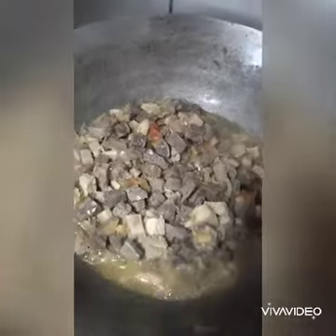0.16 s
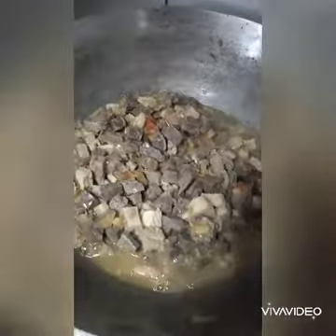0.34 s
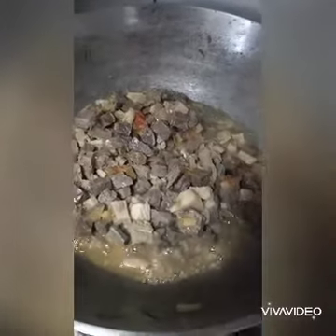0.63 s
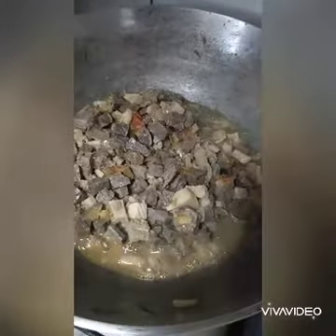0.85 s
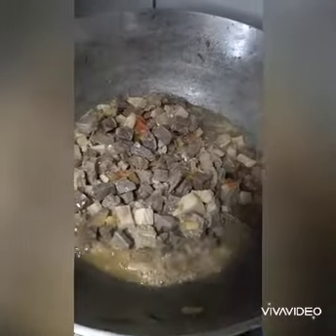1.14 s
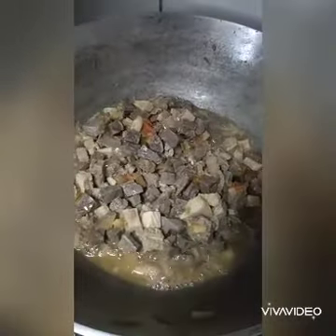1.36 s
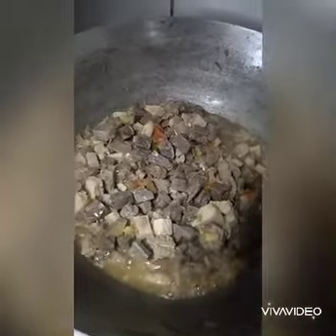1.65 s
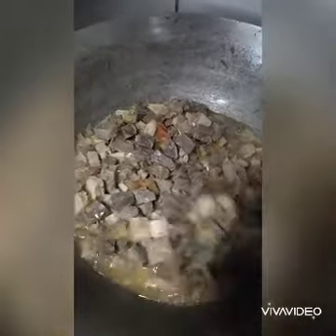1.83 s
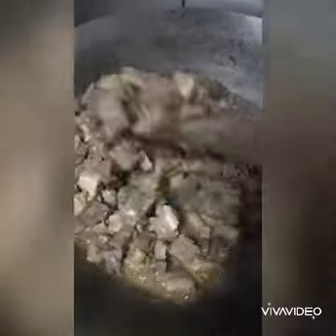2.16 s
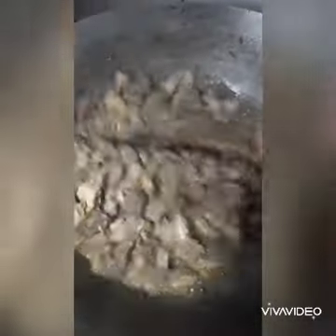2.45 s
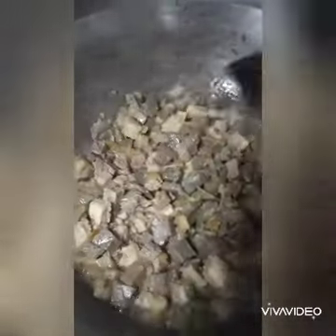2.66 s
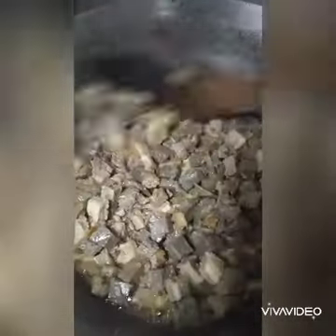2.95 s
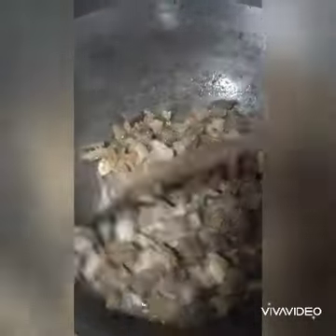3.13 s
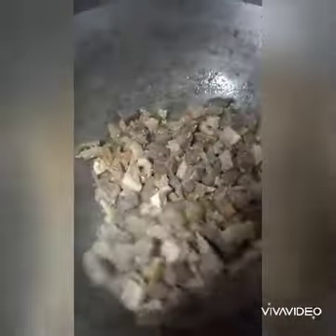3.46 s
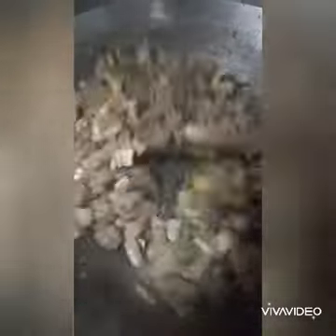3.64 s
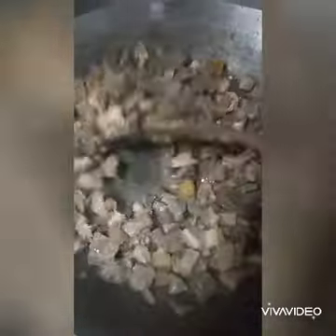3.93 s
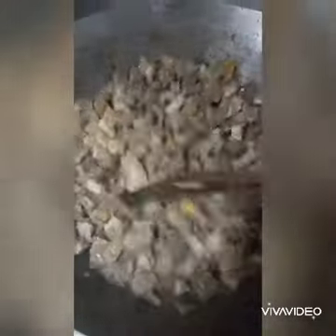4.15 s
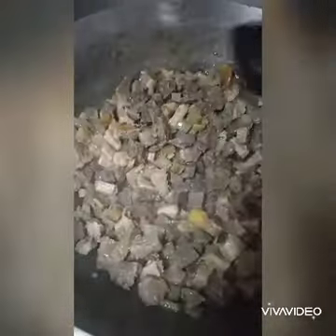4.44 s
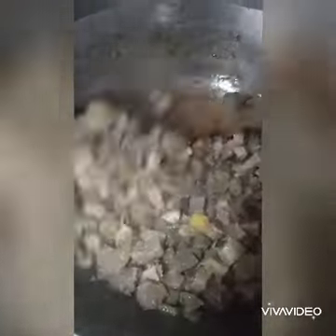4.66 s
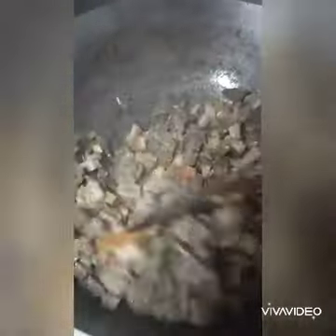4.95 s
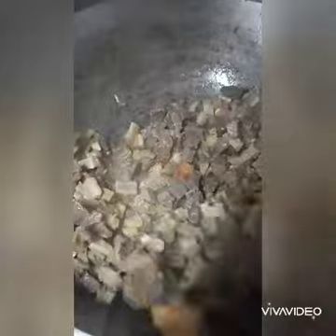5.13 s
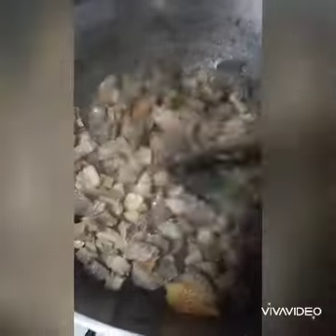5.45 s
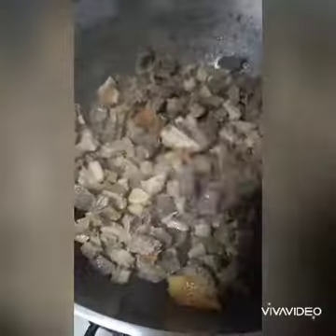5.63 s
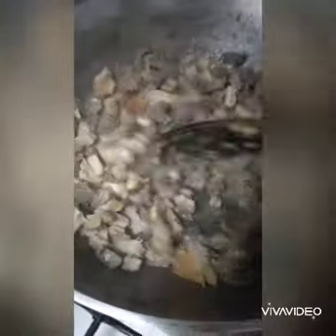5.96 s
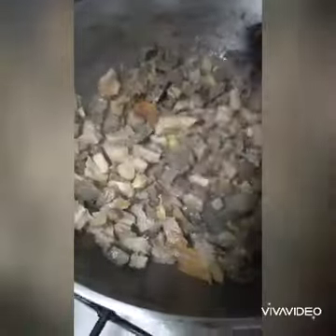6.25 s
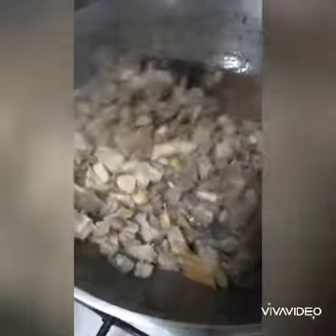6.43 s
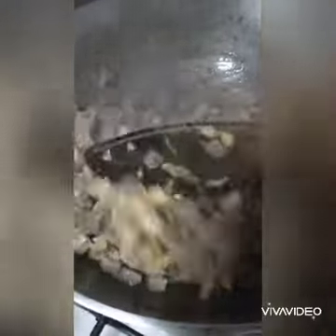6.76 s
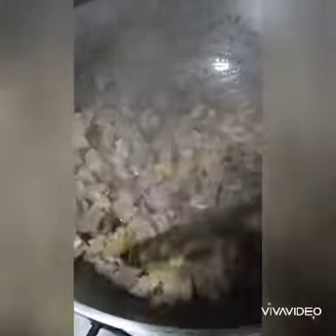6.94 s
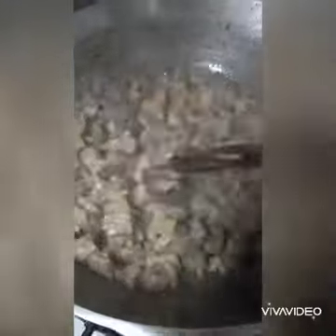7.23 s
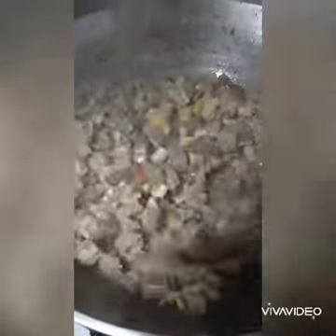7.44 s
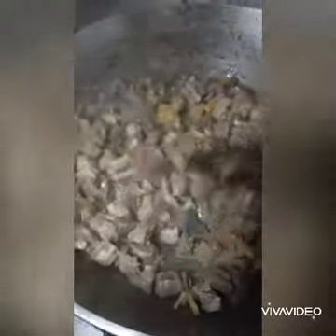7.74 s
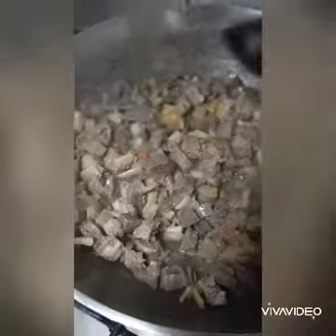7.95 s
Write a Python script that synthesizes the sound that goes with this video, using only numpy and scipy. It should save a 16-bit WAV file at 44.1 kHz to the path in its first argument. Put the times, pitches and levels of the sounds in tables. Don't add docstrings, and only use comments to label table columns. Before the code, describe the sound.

Two quick metallic clanks, then wet sizzling food stirred and tossed in a wok, with scrapes, low rumbles and scattered knocks, ending on a hard rap.

```python
import sys
import numpy as np
from scipy import signal
from scipy.fft import rfft, irfft
from scipy.io import wavfile
from scipy.ndimage import uniform_filter1d

SR = 44100
rng = np.random.default_rng(int(sys.argv[2]) if len(sys.argv) > 2 else 0)


def master(y):
    cut = np.clip(np.atleast_2d(y).T, -1, 1)
    pcm = np.round(cut * 32767)
    wavfile.write(sys.argv[1], SR, pcm.astype(np.int16))


def ratio_of_db(decibels):
    return 10 ** (np.asarray(decibels, float) / 20)


N = 356769

# (time [s], fizz level [dB], left minus right [dB], juice sloshing in the bowl [dB])
BOIL = [(0.0, -50.5, 0, -57.5), (0.7, -51, 0, -55.5), (1.44, -50, 1, -56.5), (1.85, -49, -1, -55.5),
        (2.5, -48.5, -1.5, -53.5), (3.2, -49.5, -1, -64), (3.7, -48.5, -1.5, -60), (4.1, -49, -2, -59.5),
        (4.25, -50, 0.5, -80), (4.66, -51.5, 0.5, -63), (5.1, -50.5, 0.5, -68), (5.5, -50.5, -1, -75),
        (6.1, -50.5, 1, -68), (6.5, -51.5, 2, -64), (7.07, -51.5, 2, -84), (7.6, -51.5, 3.5, -74),
        (8.09, -50, 0, -65)]
# (time [s], peak level [dB], rise by 20 dB [s], fall by 20 dB [s])
FOOD_TOSSES = [(0.17, -55, .5, .8), (0.57, -57, .05, 0.34), (1.98, -44, 0.16, 0.2), (2.16, -51.5, .4, .2),
               (2.335, -45.5, 0.29, 0.27), (2.56, -55.5, .06, 0.27), (2.69, -53, .06, 1),
               (3.07, -46, 0.1, 0.093), (3.22, -52.5, 0.33, 0.43), (3.44, -51, 0.1, 0.93),
               (3.58, -51, .4, 0.68), (3.735, -48.5, 0.62, 0.11), (4.06, -48.5, 0.056, 0.24),
               (4.37, -50.5, 0.025, .14), (4.48, -49, 0.13, 0.33), (5.17, -55, .07, .07),
               (5.3, -48.5, 0.22, 0.25), (5.42, -55.5, .2, 0.87), (5.74, -46.5, 0.067, 0.17),
               (6.1, -58, 0.23, 0.072), (6.34, -52.5, 0.17, 0.044), (6.6, -56, 0.65, .05),
               (6.86, -56, 0.16, 0.36), (7.03, -48.5, 0.084, 0.22), (7.25, -54.5, 0.19, 0.31),
               (7.49, -53.5, 0.077, .07), (7.73, -59.5, 0.35, 0.35), (7.86, -65, 0.088, 1)]
# (time [s], peak level [dB], rise by 20 dB [s], fall by 20 dB [s])
BLADE_DRAGS = [(0.2, -50.5, 0.28, 0.66), (0.37, -51, 0.41, 0.62), (0.76, -50.5, 0.057, 1),
               (1.01, -51, 0.46, 0.24), (1.26, -61, 0.077, 0.033), (1.59, -56, 0.17, .3),
               (1.84, -46, 0.044, 0.32), (1.98, -52, .2, 0.068), (2.19, -58.5, .3, .06),
               (2.43, -48.5, 0.083, 0.14), (2.76, -50.5, 0.18, 0.26), (3.03, -49, 0.03, 0.16),
               (3.1, -50, 0.099, 0.14), (3.45, -51.5, 0.059, 0.53), (3.83, -52.5, .08, 0.27),
               (3.9, -54, 0.21, .18), (4.44, -54.5, 0.072, 0.67), (4.8, -66, .1, 0.2),
               (4.93, -61.5, .1, 0.12), (5.17, -62, 0.075, 0.32), (5.36, -50, 0.17, 0.21),
               (5.77, -61.5, 0.091, 0.48), (6.26, -49, 0.13, 0.24), (6.4, -60, .1, 0.1),
               (7.22, -63.5, 0.14, 0.18), (6.76, -57.5, 0.027, 0.056), (4.17, -64, 0.061, 0.045),
               (7.405, -52, 0.011, 0.082), (7.478, -60.5, 0.076, 0.11), (7.9, -54.5, 0.079, 0.29)]
# (time [s], peak level [dB], brightness [dB per octave], blow length [s], left minus right [dB])
LIP_BLOWS = [
    (7.839, -30.5, 1.5, 0.00068, 2),
    (7.846, -25, 0.72, 0.0006, 6),
]
# (frequency [Hz], left minus right [dB])
PORT_LEAN = [(60, 2.5), (92, 4), (140, 2), (210, 9), (330, 15.5), (500, 5.5), (770, -13.5), (1170, 5.5),
             (1790, 7.5), (2740, 10), (4190, -5), (6410, 4), (9810, -14), (15000, 8)]
# (frequency [Hz], likeness [0-1])
PORT_SAMENESS = [(60, 0.9), (160, 1), (300, 0.24), (500, 0.57), (800, 0.2), (1500, 0.36), (3000, 0.12)]

LEFT_RIGHT = np.array([[0.5], [-0.5]])


def fizz():
    # (frequency [Hz], level [dB per Hz])
    left_colour = [(400, -38), (900, -72), (1300, -10), (2100, -14), (3300, -11.5), (4400, -10.5),
                   (5000, -12), (6000, -8), (8600, -5.5), (9700, -13.5), (12200, -15.5), (12700, -22),
                   (14600, -24), (15300, -11)]
    # (frequency [Hz], level [dB per Hz])
    right_colour = [(400, -45), (650, -11.5), (900, -16.5), (2000, -12), (3900, -14.5), (5000, -18.5),
                    (6200, -10), (7000, -11.5), (8000, -6), (9700, -17.5), (12000, -28), (13500, -17.5),
                    (14500, -33), (15400, -56)]
    # (frequency [Hz], width [Hz], left boost [dB], right boost [dB])
    fizz_resonances = [(633, 32, -34, 6), (1394, 39, 10, 8.5), (1663, 67, 11.5, -3), (1873, 95, 11, -7),
                       (2174, 110, 7, 1), (4486, 57, 0.5, 0), (6503, 243, 9, -18)]
    hz = np.fft.rfftfreq(N, 1 / SR)
    boost = 1
    for centre_hz, width_hz, left_db, right_db in fizz_resonances:
        boost = boost + ratio_of_db(np.array([[left_db], [right_db]])) * bell(hz, centre_hz, width_hz)
    gain = boost * ratio_of_db(np.array([read(left_colour, hz), read(right_colour, hz)]))

    bursts = evened(pops(30000, spread_db=0.8)) * ratio_of_db(0.5 * drift(460) + 0.12 * drift(4000))
    coloured = irfft(rfft(bursts, axis=1) * gain, N, axis=1)
    sound = mid_evened(patchy(coloured, depth_db=1.36))

    toss_power = ratio_of_db(-6.5) ** 2 * swells(FOOD_TOSSES)
    level = np.sqrt(ratio_of_db(column(BOIL, order=1)) ** 2 + toss_power)
    return sound * level * ratio_of_db(2.5 + column(BOIL, order=2) * LEFT_RIGHT)


def tumbling():
    # (frequency [Hz], level [dB per Hz])
    slap_colour = [(500, -17), (900, -12), (1500, 0.5), (2300, -1), (3100, -4.5), (3700, -21), (8000, -28)]
    still_db, juice_to_food_db, juice_share = -58, -2.5, 1
    slaps = pops(9000, spread_db=2.5) * ratio_of_db(1.5 * drift(760))
    sound = mid_evened(to_ports(slaps, lambda hz: ratio_of_db(read(slap_colour, hz))))
    wet_db = still_db + juice_to_food_db + juice_share * (column(BOIL, order=3) - still_db)
    level = np.sqrt(swells(FOOD_TOSSES) + ratio_of_db(wet_db) ** 2)
    return sound * level * ratio_of_db(-5 * LEFT_RIGHT)


def knocks():
    # (time [s], peak level [dB], brightness [dB per octave], blow length [s], left minus right [dB])
    floor_blows = [
        (0.016, -24.5, 6.5, 0.0019, 6),
        (0.023, -29.5, 5.5, 0.00069, 12),
        (2.685, -21.5, 1.5, 0.00044, 2),
        (3.057, -43, -7, 0.0087, -8),
        (3.819, -43, -10, 0.012, -5),
        (7.405, -44, -8, 0.0024, -7),
    ]
    slope_blows = [
        (4.362, -26.5, 0, 0.0011, 2.7),
    ]
    buried_blows = [
        (3.486, -23.5, -6, 0.0022, 1),
    ]
    rim_blows = [
        (6.141, -28, 0.87, 0.00061, 3),
        (6.146, -36, 0, 0.0011, 11),
    ]
    lid_blows = [
        (.001, -19.5, 2.4, 0.00078, 4),
        (.049, -16.5, 3.1, 0.00034, 5.2),
    ]
    # (frequency [Hz], level [dB], decay by 60 dB [s])
    lid_modes = [(150, -2.5, 0.13), (291, -10, 0.92), (345, -11, 0.4), (447, 5, 0.3), (530, -2, 0.19),
                 (604, -7.5, 0.29), (749, -7, 0.18), (905, -18, 0.33), (1075, -13, .3), (1400, -7, 0.11),
                 (1674, 7.5, 0.05), (2113, -2.5, 0.42), (2470, -7.5, .07)]
    wok_hz = [183, 253, 346, 420, 614, 657, 725, 806, 858, 1024, 1213, 1464, 2014, 2261]
    wok_t60 = [0.81, 0.53, 0.12, 0.39, 0.29, 0.21, 0.099, 0.23, 0.22, 0.37, 0.3, 0.44, 0.34, 0.17]
    floor_db = [-12, -7, 1, 1, -6, -3.5, 8, 0.5, -8, -4, -8, -15, -14, -4.5]
    slope_db = [-16.5, -13, 0.5, -4, -22, -9, -0.5, -9, -8, -6.5, -11, -27, -21, -12]
    rim_db = [-6.5, -16, -6, 2, -5, -4, -18, -6, 0.5, -28, -3.5, -10, -9, -16]
    lip_db = [-23, -9, -10, 0, -3, 3.5, -6, -20, -31, -10, -14, -10, -18.5, -22]

    size = SR // 2
    smothering = ratio_of_db(-60 * np.arange(size) / SR / 0.13)
    wok = [(floor_blows, floor_db, 1), (slope_blows, slope_db, 1), (buried_blows, floor_db, smothering),
           (rim_blows, rim_db, 1), (LIP_BLOWS, lip_db, 1)]
    places = [(blows, list(zip(wok_hz, mode_db, wok_t60)), damping) for blows, mode_db, damping in wok]
    places.append((lid_blows, lid_modes, 1))

    out = np.zeros((2, N + SR))
    for blows, modes, damping in places:
        for s, peak_db, tilt_db, blow_s, lean_db in blows:
            start = round(s * SR)
            sound = knock(modes, peak_db, tilt_db, blow_s, size) * damping
            out[:, start:start + size] += sound * ratio_of_db(lean_db * LEFT_RIGHT)
    return out[:, :N]


def knock(modes, peak_db, tilt_db, blow_s, size):
    # (frequency [Hz], level [dB per Hz])
    clatter_colour = [(150, -22.5), (400, 5), (1200, -1), (2500, -10), (3500, -18), (6000, -59)]
    # (frequency [Hz], decay by 60 dB [s])
    clatter_decay = [(150, 0.84), (500, 0.44), (1500, 0.3), (3000, 0.13)]
    t = np.arange(size) / SR
    hz, mode_db, t60 = np.transpose(modes)[:, :, None]
    phase_chance, level_chance = rng.standard_normal((2, len(hz), 1))

    unlike = 1 - np.clip(read(PORT_SAMENESS, hz), 0, 1)
    apart = np.pi * unlike * 0.6 * np.tanh(phase_chance)
    level_db = mode_db + tilt_db * np.log2(hz / 500) + 0.71 * level_chance - 60 * t / t60
    lean_db = 0.57 * read(PORT_LEAN, hz) / 2
    rings = []
    for side in (1, -1):
        waves = np.sin(2 * np.pi * hz * t + side * apart / 2)
        rings.append((ratio_of_db(level_db + side * lean_db) * waves).sum(0))
    rings = np.array(rings)

    hiss = rng.standard_normal((2, size))
    coloured = to_ports(hiss, lambda f: ratio_of_db(read(clatter_colour, f) + tilt_db * np.log2((f + 50) / 500)))
    f, frame_s, z = signal.stft(coloured, SR, nperseg=256)
    dying = ratio_of_db(-60 * frame_s / read(clatter_decay, f)[:, None])
    clatter = signal.istft(z * dying, SR, nperseg=256)[1][:, :size]
    clatter *= 1 + 1.27 * np.exp(-t / 0.0019)

    sound = rings / abs(rings.mean(0)).max() + ratio_of_db(-6.0) * clatter / abs(clatter.mean(0)).max()
    return ratio_of_db(peak_db) * sound * (1 - np.exp(-t / max(blow_s, 1e-4)))


def dragging():
    # (frequency [Hz], width [Hz], level [dB])
    rim_resonances = [(168, 61, -3), (254, 66, -9), (294, 20.5, 0), (345.5, 33, 5), (426.5, 48, -5)]
    power = swells(BLADE_DRAGS) + ratio_of_db(-94) ** 2
    return rubbing(rim_resonances, power, per_s=1500, lumpy_db=1.3, trim_db=-2.37)


def stirred_bowl():
    # (frequency [Hz], width [Hz], level [dB])
    bowl_resonances = [(663, 74, -3), (767, 59, -1.5), (905, 38, -5), (1037, 88, 3.5), (1178, 126, -4)]
    from_drag_db, from_toss_db = -10.5, -10
    power = ratio_of_db(column(BOIL, order=3)) ** 2
    power = power + ratio_of_db(from_drag_db) ** 2 * swells(BLADE_DRAGS)
    power = power + ratio_of_db(from_toss_db) ** 2 * swells(FOOD_TOSSES)
    return rubbing(bowl_resonances, power, per_s=6000, lumpy_db=2.5, trim_db=-0.5)


def rocking():
    # (frequency [Hz], width [Hz], level [dB])
    stand_resonances = [(45, 19, -9), (86.2, 29, 0.5), (120, 74, -8), (175, 18, -9)]
    # (time [s], peak level [dB], rise by 20 dB [s], fall by 20 dB [s])
    wok_rocks = [(0.1, -52.5, 0.46, .7), (0.72, -51, 0.056, .15), (0.85, -54.5, 0.23, 0.38),
                 (1.17, -68, 0.26, 0.031), (1.31, -61.5, 0.076, .3), (1.71, -63, 0.035, .1),
                 (1.84, -49.5, 0.037, 0.94), (1.98, -58, 0.22, 0.14), (2.31, -61, 0.12, 0.9),
                 (2.53, -64, .2, 0.1), (2.77, -47, .08, 0.44), (2.995, -50.5, 0.028, 0.74),
                 (3.1, -50.5, 0.068, 0.11), (3.42, -59, 0.032, 0.29), (3.54, -43, 0.12, 0.13),
                 (3.68, -52.5, .3, 0.5), (3.86, -50, 0.14, 0.17), (5.97, -64, 0.073, .06),
                 (4.44, -52, 0.11, 0.54), (4.7, -60, .3, .1), (7.24, -57, 0.065, 0.18),
                 (5.174, -60.5, 0.032, 0.15), (5.34, -56, 0.13, 0.54), (5.68, -64.5, 0.37, .25),
                 (5.84, -61, 0.11, 0.046), (6.31, -45.5, 0.19, .2), (6.59, -56, 0.21, 0.58),
                 (6.98, -51.5, 0.15, 0.28), (7.46, -53, 0.08, 0.11), (7.735, -52, .03, 0.61)]
    knock_s, knock_db = LIP_BLOWS[-1][:2]
    rise_s, fall_s = 0.042, 0.42
    shudder = (knock_s + rise_s, knock_db - 19.5, rise_s, fall_s)
    power = swells(list(wok_rocks) + [shudder]) + ratio_of_db(-83) ** 2
    return rubbing(stand_resonances, power, per_s=1200, lumpy_db=1.0, trim_db=0.0)


def rubbing(modes, power, per_s, lumpy_db, trim_db):
    slips = pops(per_s, spread_db=1.5) * ratio_of_db(lumpy_db * drift(1120))
    sound = to_ports(slips, lambda hz: sum(ratio_of_db(db) * bell(hz, f, w) for f, w, db in modes))
    return mid_evened(sound) * np.sqrt(power) * ratio_of_db(trim_db)


def swells(rows):
    s, db, rise, fall = np.transpose(rows)[:, :, None]
    t = np.arange(0, N + 64, 64) / SR
    rising = (s - t) / np.maximum(rise, 0.005)
    falling = (t - s) / np.maximum(fall, 0.005)
    power = ratio_of_db(db - 20 * np.maximum(rising, falling)) ** 2
    return np.interp(np.arange(N) / SR, t, power.sum(0))


def pops(per_s, spread_db):
    spread = ratio_of_db(spread_db * np.minimum(rng.exponential(1, (2, N)), 5))
    size = spread * rng.standard_normal((2, N))
    return size * (rng.random((2, N)) < per_s / SR)


def to_ports(pair, gain):
    hz = np.fft.rfftfreq(pair.shape[1], 1 / SR)
    a, b = rfft(pair, axis=1)
    same = np.clip(read(PORT_SAMENESS, hz), 0, 1)
    lean = ratio_of_db(read(PORT_LEAN, hz) / 2)
    left = a * lean
    right = (same * a + np.sqrt(1 - same ** 2) * b) / lean
    return irfft(np.array([left, right]) * gain(hz), pair.shape[1], axis=1)


def patchy(x, depth_db):
    z = signal.stft(x, nperseg=1024, noverlap=768)[2]
    z = z * ratio_of_db(depth_db * blotches(z.shape, bins=10, frames=12))
    return signal.istft(z, nperseg=1024, noverlap=768)[1][:, :N]


def blotches(shape, bins, frames):
    field = uniform_filter1d(rng.standard_normal(shape), bins, axis=1)
    return evened(uniform_filter1d(field, frames, axis=2))


def drift(samples):
    once = uniform_filter1d(rng.standard_normal(N), samples)
    return evened(uniform_filter1d(once, samples))


def bell(hz, centre_hz, width_hz):
    return 1 / (1 + (2 * (hz - centre_hz) / width_hz) ** 2)


def read(points, hz):
    f, value = np.transpose(points)
    return np.interp(np.log(hz + 1), np.log(f + 1), value)


def column(rows, order):
    return np.interp(np.arange(N) / SR, [r[0] for r in rows], [r[order] for r in rows])


def evened(x):
    return x / np.sqrt(np.mean(x ** 2) + 1e-20)


def mid_evened(x):
    return x / np.sqrt(np.mean(x.mean(0) ** 2))


def scene():
    return fizz() + tumbling() + knocks() + dragging() + stirred_bowl() + rocking()


def gated(x):
    # (frequency [Hz], left [dB], right [dB])
    gate_limits = [(2030, -9.5, -12), (3100, 1, -2), (4600, -12.5, -3), (4860, 1.5, 3), (5770, -2.5, -10.5),
                   (6340, -22, -3), (8600, -7.5, -3.5), (9760, 0.5, 1), (10250, 6, 6), (11960, -11, -8),
                   (12500, -15, 3), (12700, -1, 4.5), (14300, 10, 10), (15000, -2.5, 16)]
    # (frequency [Hz], shift [dB per dB])
    busy_shift = [(4800, -1), (7500, 0), (9000, 2.5), (11000, 0), (12500, -1), (14000, -1.5)]
    hz, _, z = signal.stft(x, SR, nperseg=2048, noverlap=1536)
    power = uniform_filter1d(abs(z) ** 2, size=2, axis=1)
    power_db = 10 * np.log10(uniform_filter1d(power, size=4, axis=2) + 1e-20)
    above_db = power_db - uniform_filter1d(power_db, size=45, axis=2)

    at_hz, *limits = np.transpose(gate_limits)
    shut_db = np.array([np.interp(hz, at_hz, limit, left=-99) for limit in limits])[:, :, None]
    treble_power = (abs(z[:, hz > 5000]) ** 2).mean((0, 1))
    busy_db = 10 * np.log10(uniform_filter1d(treble_power, size=70) + 1e-20)
    shut_db = shut_db + read(busy_shift, hz)[:, None] * (busy_db - np.median(busy_db))
    wander = blotches(z.shape, bins=6, frames=4)
    shut_db = shut_db + 2.45 * wander + 3.25 * wander.sum(0)

    opening = np.clip((above_db - shut_db) / 0.25 + 0.5, 0, 1)
    return signal.istft(z * opening, SR, nperseg=2048, noverlap=1536)[1][:, :N]


def roll_off(x):
    return signal.sosfilt(signal.butter(12, 15530, fs=SR, output="sos"), x)


def record(dry):
    return roll_off(gated(dry))


dry = scene()
out = record(dry)
master(out)
```